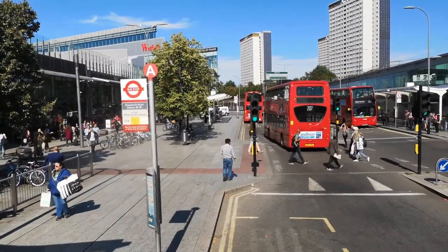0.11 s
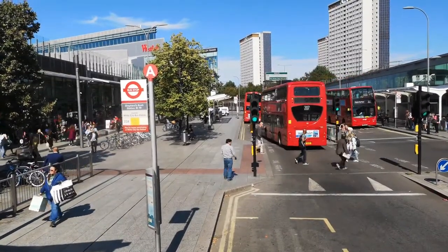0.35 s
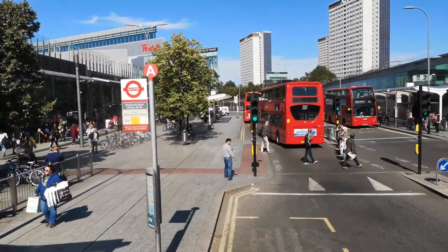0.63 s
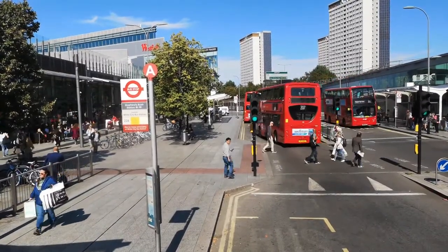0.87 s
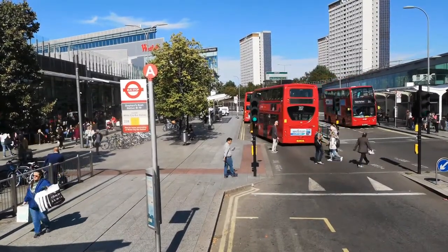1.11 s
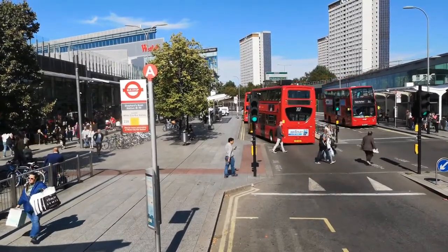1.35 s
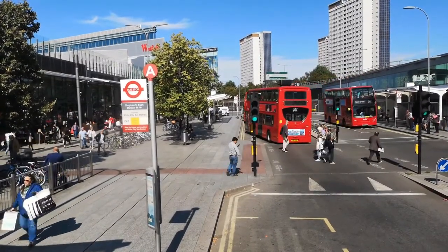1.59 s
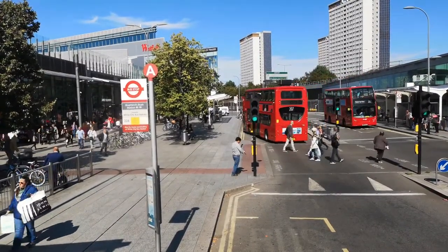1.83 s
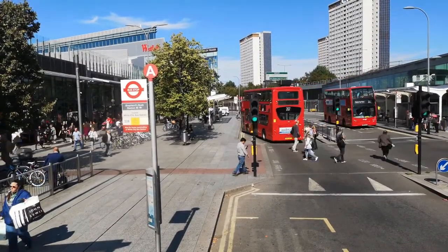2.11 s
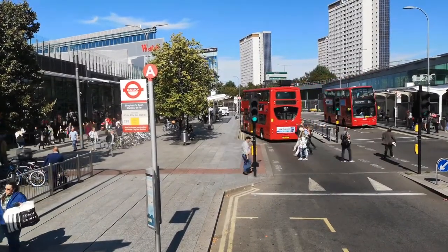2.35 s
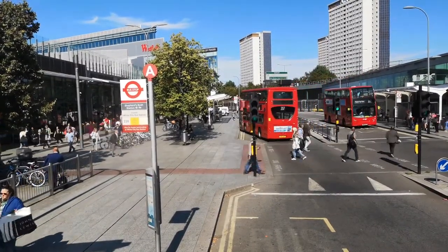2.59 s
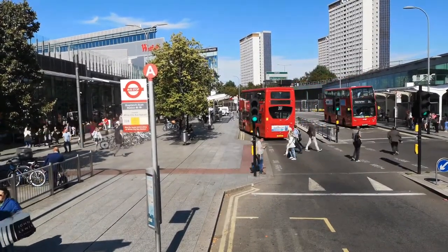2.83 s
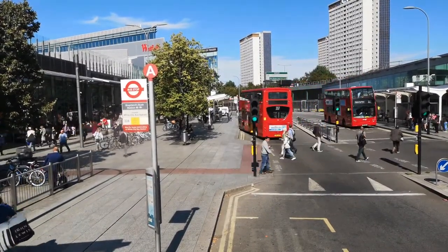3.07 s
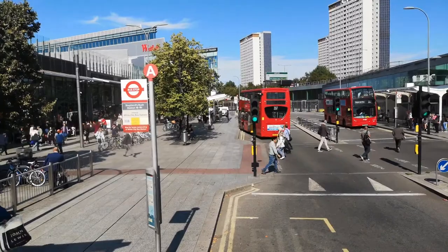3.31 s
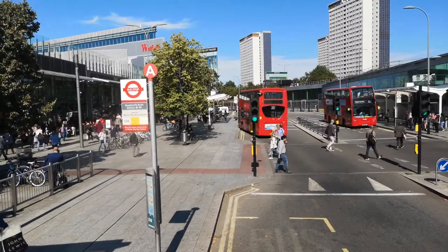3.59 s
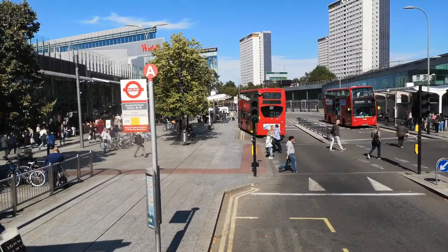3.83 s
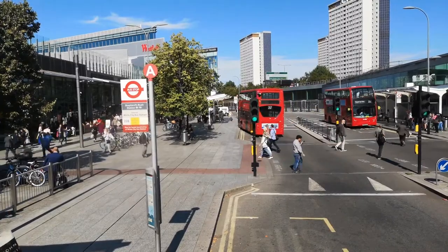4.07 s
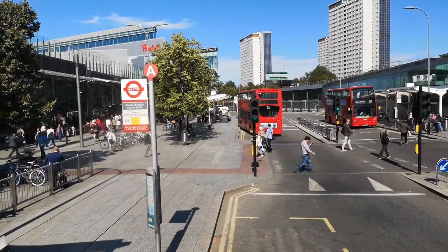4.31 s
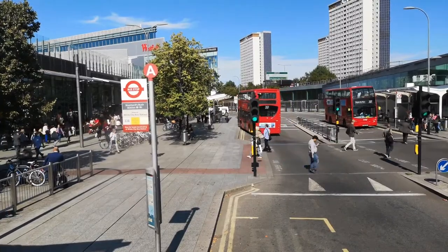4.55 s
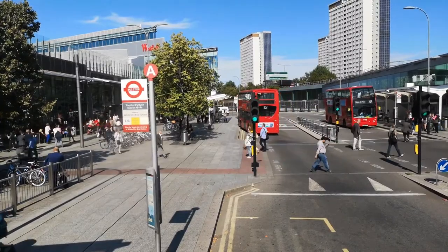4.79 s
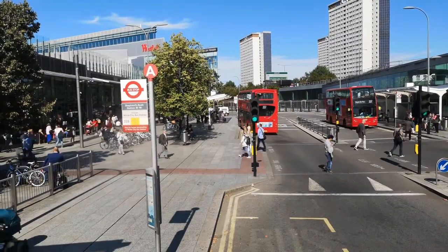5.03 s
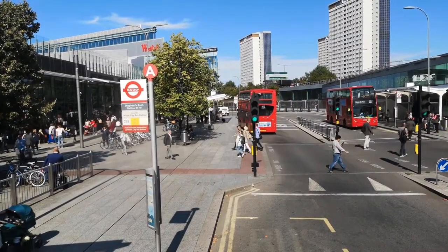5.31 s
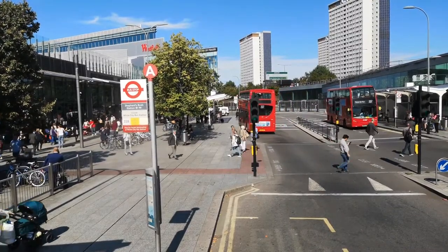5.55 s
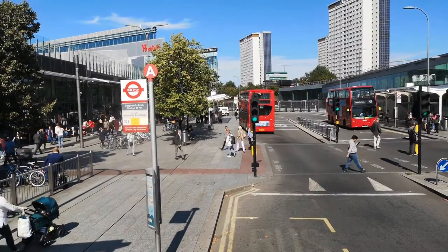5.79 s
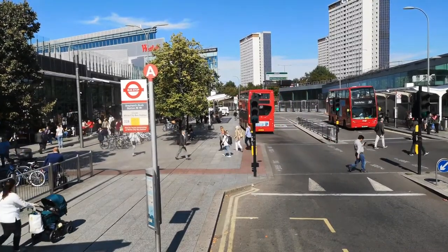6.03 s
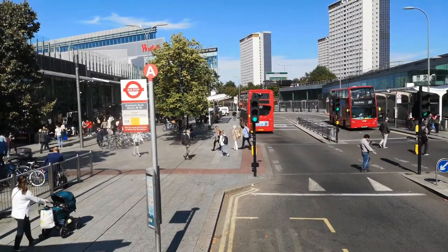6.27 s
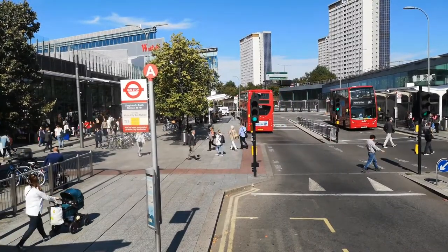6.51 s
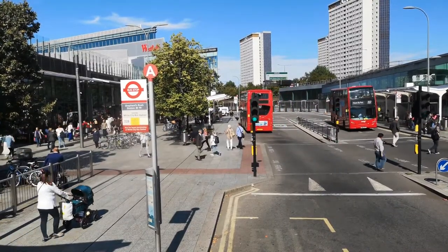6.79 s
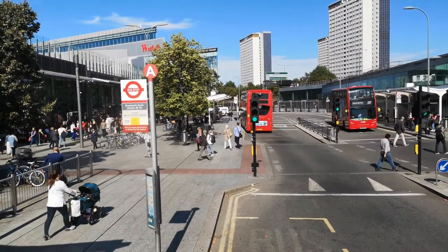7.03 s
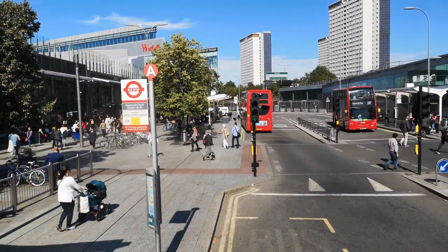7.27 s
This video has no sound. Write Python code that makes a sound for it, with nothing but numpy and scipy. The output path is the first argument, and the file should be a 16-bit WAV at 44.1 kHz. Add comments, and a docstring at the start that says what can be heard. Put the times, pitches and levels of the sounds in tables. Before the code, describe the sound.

A very loud, deep bus idle drone dominates a busy junction, with a vehicle rushing past early, then scattered heel knocks, scuffs and clicks close by.

```python
"""At a street junction a bus idles: its exhaust drones on one deep, nearly pure firing tone with weaker orders.
Traffic roars behind it as shaped noise: a vehicle passes close early on, then the street settles.
Close by, heels ring the paving's modes, hard tips clack and soft blows thump on one low note each.
Soles scuff as gritty noise, small metal parts squeak as resonant noise, and walls answer with a noise tail.
The drone drives the microphone pair into its limiter."""
import sys
import numpy as np
from scipy import signal
from scipy.fft import rfft, irfft, next_fast_len
from scipy.io import wavfile
from scipy.ndimage import uniform_filter1d, minimum_filter1d, map_coordinates

SR = 44100
rng = np.random.default_rng(int(sys.argv[2]) if len(sys.argv) > 2 else 0)


def boost(x):
    """Linear amplitude factor 10**(x/20) for a level x in decibels (scalar or array-like)."""
    u = np.asarray(x, float) / 20
    return 10 ** u


def wav_out(sig):
    """Save sig, one row per channel (or a flat mono array), as 16-bit PCM at SR to the path in sys.argv[1]."""
    wavfile.write(sys.argv[1], SR, np.round(np.clip(np.atleast_2d(sig).T, -1, 1) * 32767).astype(np.int16))


N = 325899

# Grit spectrum of a hard contact with paving. Each row: frequency in Hz, relative level per Hz in dB.
GRIT_SPECTRUM = [(880, -50), (1500, -5), (2100, -6), (2590, -1), (2940, -8), (3250, -8), (4300, -12.5),
                 (6000, -10.5), (7900, -12.5), (9500, -20), (11000, -33), (13000, -37), (15000, -43.5),
                 (16000, -55)]


def unit(x):
    """Scales to rms 1."""
    return x / np.sqrt(np.mean(x ** 2) + 1e-20)


def along(points, hz):
    """Interpolates (Hz, value) points on a log frequency axis."""
    point_hz, value = np.transpose(points)
    return np.interp(np.log(hz + 1), np.log(point_hz + 1), value)


def curves(rows):
    """Gives one value per sample for each column after the time in seconds."""
    s, *columns = np.transpose(rows)
    return [np.interp(np.arange(N) / SR, s, column) for column in columns]


def wobble(knots_per_s):
    """Smooth random curve through normal random knots."""
    return map_coordinates(rng.standard_normal(200), [np.arange(N) * knots_per_s / SR])


def filtered(x, response):
    """Multiplies the spectrum of x by a response of frequency."""
    m = next_fast_len(x.shape[-1] + 8192)
    spectrum = rfft(x, m) * response(np.fft.rfftfreq(m, 1 / SR))
    return irfft(spectrum, m)[..., :x.shape[-1]]


def pair(a, b):
    """Spaced microphones: channels alike in the bass, partly opposed near 900 Hz, unrelated far above."""
    lag_s = 0.00054  # for sound arriving from either side of the street

    def mix_angle(hz):
        correlation = np.cos(2 * np.pi * hz * lag_s) / (1 + (hz / 1000) ** 4)
        return np.arccos(correlation) / 2

    def response(hz):
        return np.array([np.cos(mix_angle(hz)), np.sin(mix_angle(hz))])

    mid, side = filtered(np.array([a, b]), response)
    return np.array([mid + side, mid - side])


def add(track, s, sound):
    """Mixes a short sound into a track at a time in seconds."""
    spot = track[..., round(s * SR):][..., :sound.shape[-1]]
    spot += sound[..., :spot.shape[-1]]


def held(t, length_s, rise_s, t60_s):
    """Envelope that rises exponentially and starts to die after a length."""
    return (1 - np.exp(-t / rise_s)) * boost(-60 * np.maximum(t - length_s, 0) / t60_s)


def rush(spectrum, patchy_db):
    """Stereo noise of rms 1 with time-frequency patches of random gain."""
    z = signal.stft(rng.standard_normal((2, N)), nperseg=1024)[2]
    field = rng.standard_normal(z.shape[1:])
    for axis in (0, 1):
        field = uniform_filter1d(field, size=6, axis=axis)
    noise = signal.istft(z * boost(patchy_db * unit(field)), nperseg=1024)[1][:, :N]
    shaped = filtered(noise, lambda hz: boost(along(spectrum, hz)))
    return unit(pair(*shaped))


def traffic():
    """Distant engines, tyres and air as noise bands under one swell; the air hiss follows it most."""
    # Each row: frequency in Hz, relative level per Hz in dB.
    rumble_spectrum = [(26, -36.5), (45, -12.5), (56, -14), (60, -33.5), (64, -26.5), (76, -17),
                       (92, -22.5), (105, -16.5), (162, -23), (236, -21.5), (269, -29.5), (320, -29.5),
                       (600, -37), (780, -75.5), (1320, -120)]
    tyre_spectrum = [(290, -11.5), (500, -14.5), (581, -9.5), (664, 3.5), (766, -5), (926, -1.5),
                     (1210, -13), (1430, -9), (1780, -11), (2040, -13), (2440, -18), (2690, -18.5),
                     (3300, -36), (4290, -41), (7260, -120)]
    hiss_spectrum = [(1650, -11), (2800, -2.5), (3080, -7.5), (5400, -9), (6250, -12.5), (7550, -12.5),
                     (8730, -14.5), (11300, -30.5), (14700, -38.5), (15500, -60.5), (16000, -72.5)]
    # A close pass early on, then a calmer street. Each row: time in seconds, swell in dB.
    swell = [(0, -8), (0.1, 6), (0.27, 9.5), (0.45, 9.5), (0.72, 15), (1.05, 7.5), (1.3, 4), (1.65, 6.5),
             (2.6, 2), (2.9, 4.5), (3.5, -1), (3.9, 2), (4.5, -3), (4.82, 0), (6.1, -3), (6.9, -2.5),
             (7.15, 1), (7.39, 1.5)]
    swell_db, = curves(swell)
    shared = wobble(16)
    # nominal rms in dB with no swell, plus a share of the swell, plus random flutter
    rumble_db = -21.5 + 0.27 * swell_db + 1.3 * wobble(8.3)
    tyres_db = -32.5 + 0.27 * swell_db + 1.0 * shared
    hiss_db = -47.5 + swell_db + 0.86 * shared
    rumble = boost(rumble_db) * rush(rumble_spectrum, patchy_db=1)
    tyres = boost(tyres_db) * rush(tyre_spectrum, patchy_db=1.0)
    hiss = boost(hiss_db) * rush(hiss_spectrum, patchy_db=2.5)
    return rumble + tyres + hiss


def walls(x):
    """Diffuse echo: a noise tail whose every frequency dies at its own speed."""
    # Each row: frequency in Hz, t60 in seconds.
    wall_decay = [(150, 0.38), (500, 0.21), (2000, 0.38), (10000, 0.055)]
    hz, t, z = signal.stft(rng.standard_normal((2, SR // 2)), SR, nperseg=256)
    decay = boost(-60 * t / along(wall_decay, hz)[:, None])
    tails = signal.istft(z * decay, SR, nperseg=256)[1]
    tails = tails / np.linalg.norm(tails[0])
    return pair(*signal.fftconvolve(x[None], tails, axes=1)[:, :N])


def squeaks():
    """Squeaks, rattles and dull rubs: juddering friction noise through one resonance each."""
    # Each row: start in seconds, level in dB, pitch in Hz, bandwidth in Hz, length in seconds.
    rubs = [(0.118, -38.5, 2630, 251, 0.13), (0.365, -36.5, 2550, 402, 0.18),
            (0.434, -29.5, 1670, 1800, 0.029), (0.463, -29, 2150, 2000, 0.035),
            (0.521, -27, 1960, 1500, 0.034), (0.616, -15, 188, 92.5, 0.078), (0.602, -25, 1720, 198, 0.041),
            (0.61, -28, 2110, 900, 0.061), (0.63, -23.5, 930, 395, 0.055), (0.692, -26, 1680, 403, 0.021),
            (0.713, -31.5, 1500, 1410, 0.045), (0.818, -32, 1100, 890, 0.055),
            (0.813, -37, 2620, 890, 0.055), (0.702, -26.5, 1093, 520, 0.041), (1.369, -36, 3770, 400, 0.03),
            (1.38, -40, 3840, 120, 0.085), (1.455, -37.5, 1650, 400, 0.05),
            (2.022, -42.5, 3320, 149, 0.014), (2.209, -47, 3750, 150, 0.06),
            (2.758, -34.5, 1600, 1500, 0.017), (2.779, -32.5, 2210, 1790, 0.035),
            (2.838, -32.5, 1890, 2200, 0.053), (2.841, -21.5, 193.5, 89, 0.15),
            (2.893, -35, 5050, 200, 0.017), (2.898, -27, 4720, 237, 0.018), (2.947, -39, 4930, 503, 0.035),
            (2.911, -36, 2750, 199, 0.053), (2.916, -39.5, 3140, 1180, 0.064),
            (3.182, -32, 2785, 352, 0.018), (3.829, -30.5, 1990, 1190, 0.023),
            (3.888, -35.5, 3520, 2560, 0.027), (4.25, -39.5, 2770, 496, 0.023),
            (4.256, -32, 1780, 600, 0.018), (4.316, -32.5, 2490, 1190, 0.0082),
            (4.109, -29, 523, 203, 0.0074), (4.626, -49.5, 3470, 594, 0.03),
            (4.692, -35, 1990, 1810, 0.017), (4.758, -42.5, 1500, 1500, 0.011),
            (6.462, -24, 1554, 250, 0.013), (6.569, -37.5, 1960, 1500, 0.004),
            (6.74, -31, 1780, 900, 0.0084), (6.799, -32.5, 1890, 1210, 0.031),
            (6.832, -37, 2520, 250, 0.033), (6.835, -37.5, 7900, 500, 0.008),
            (6.841, -42.5, 7450, 500, 0.0098), (6.887, -52, 7800, 500, 0.043),
            (6.824, -41, 5130, 200, 0.034), (6.887, -49, 4820, 900, 0.045), (7.147, -35, 1605, 204, 0.026),
            (7.315, -31.5, 1920, 1000, 0.0076)]
    rise_share, sag_db, release_t60_s = 0.057, 1.5, 0.17  # rise as a share of the length; sag along it
    track, t = np.zeros((2, N)), np.arange(SR // 5) / SR
    for s, db, centre_hz, width_hz, length_s in rubs:
        noise = rng.standard_normal((2, len(t)))
        band = filtered(noise, lambda hz: 1 / (1 + (2 * (hz - centre_hz) / width_hz) ** 2))
        power = np.abs(uniform_filter1d(np.mean(band ** 2, 0), size=900))
        band = band / np.sqrt(power + 1e-12)  # steady pressure
        judder = boost(1.9 * unit(uniform_filter1d(rng.standard_normal(len(t)), size=300)))
        level = boost(db - sag_db * np.minimum(t / length_s, 1))
        envelope = held(t, length_s, rise_share * length_s, release_t60_s)
        add(track, s, level * envelope * judder * band)
    return pair(*track)


def scuffs():
    """Soles sliding and ticking: gritty noise that swells while the sole slides, then fades."""
    # Each row: start in seconds, level in dB, slide in seconds, tilt in dB an octave.
    slides = [(.108, -14, 0.07, 3.5), (0.358, -35.5, 0.1, -6), (0.52, -26.5, 0.031, 2),
              (0.565, -45, 0.0086, -1), (0.681, -42.5, 0.026, 11.5), (1.699, -31.5, 0.05, 12.5),
              (1.745, -31.5, 0.018, 4), (1.784, -49.5, 0.014, 8), (1.9, -45, 0.0066, 1),
              (2.003, -42, 0.041, 4), (2.149, -43, 0.05, 6.5), (2.211, -39.5, 0.033, 6),
              (2.84, -34.5, 0.048, -3.5), (3.183, -32, 0.015, -4.5), (3.592, -40.5, 0.013, 2),
              (3.833, -37, 0.01, -6), (3.89, -33.5, 0.015, -4.5), (4.038, -42.5, 0.011, 3),
              (4.168, -43.5, 0.017, -2.5), (4.248, -34, 0.018, 2.5), (4.309, -28, 0.0072, -0.5),
              (4.755, -35, 0.012, -2), (5.133, -35.5, 0.0077, -2.5), (5.648, -38.5, 0.012, -5),
              (6.144, -29.5, 0.0063, -11.5), (6.325, -39.5, 0.01, -7), (6.441, -39, 0.0088, -4.5),
              (6.463, -31, 0.039, -8), (6.575, -45, 0.014, -18), (6.743, -46.5, 0.02, 2.5),
              (6.836, -41, 0.036, 6.5), (6.97, -43, 0.027, 0), (7.141, -35.5, .04, -1.5),
              (7.311, -46, 0.01, -20)]
    full_slide_s = 0.09  # rise as long as the slide; shorter slides start more sharply
    track, t = np.zeros((2, N)), np.arange(SR // 4) / SR
    for s, db, slide_s, tilt_db in slides:
        noise = rng.standard_normal((2, len(t)))
        roughness = boost(1.5 * unit(uniform_filter1d(rng.standard_normal(len(t)), size=64)))

        def response(hz):
            return boost(along(GRIT_SPECTRUM, hz) + tilt_db * np.log2(hz / 5000 + 0.0089))

        grit = unit(filtered(noise * roughness, response))
        rise_s = slide_s * (slide_s / full_slide_s) ** 2
        add(track, s, boost(db) * held(t, slide_s, rise_s, 0.15) * grit)
    return pair(*track)


def thumps():
    """Soft low blows that swell and die on one note."""
    # Each row: start in seconds, strength in dB, pitch in Hz.
    blows = [(0.624, -10.5, 112), (0.778, -7, 93.5), (1.618, -18, 78), (2.825, -8, 87.4),
             (3.152, -10, 114.3), (3.454, -10, 85.3), (4.119, -13, 256), (5.381, -2.5, 93.8),
             (5.805, -12.5, 100.3), (6.763, -20, 93)]
    track, t = np.zeros(N), np.arange(SR // 2) / SR
    for s, db, hz in blows:
        envelope = held(t, 0, rise_s=0.01, t60_s=0.31)
        add(track, s, boost(db) * envelope * np.sin(2 * np.pi * hz * t))
    return track


def clacks():
    """Hard heel tips: a noise crack and a few short bright modes, retuned slightly at each strike."""
    # Each row: start in seconds, strength in dB.
    strikes = [(0.525, -39.5), (1.899, -41.5), (2.761, -38), (3.183, -41.5), (3.891, -38), (4.114, -41),
               (4.308, -34), (4.318, -33.5), (4.756, -47), (6.463, -19), (6.475, -28), (6.576, -31)]
    # Each row: nominal frequency in Hz, nominal level in dB, t60 in seconds.
    tip_modes = [(1500, 6, 0.055), (1740, -2.5, 0.14), (2305, -2, 0.098), (2500, -12, 0.12),
                 (2624, -6.5, 0.12), (3265, -10.5, 0.04)]
    crack_db, crack_t60_s = -10, 0.013
    track, t = np.zeros(N), np.arange(SR // 8) / SR
    hz, mode_db, t60_s = np.transpose(tip_modes)[..., None]
    for s, db in strikes:
        levels_db = mode_db + rng.normal(0, 1.6, hz.shape)
        struck_hz = hz * rng.normal(1, 0.017, hz.shape)
        phase = rng.uniform(0, 2 * np.pi, hz.shape)
        modes = boost(levels_db - 60 * t / t60_s) * np.sin(2 * np.pi * struck_hz * t + phase)
        ring = held(t, 0.0075, rise_s=0.0015, t60_s=0.15) * modes.sum(0)
        noise = rng.standard_normal(len(t))
        crack = unit(filtered(noise, lambda f: boost(along(GRIT_SPECTRUM, f)) / (1 + (f / 3000) ** 4)))
        add(track, s, boost(db) * (ring + boost(crack_db - 60 * t / crack_t60_s) * crack))
    return track


def heels():
    """Each strike rings the paving's modes until the sole lands and damps them."""
    # Each row: start in seconds, strength in dB, dull modes in dB, upper modes in dB,
    # ringing before damping in seconds.
    strikes = [(0.521, -16, -11.5, -10, 0.033), (0.615, -34, 11, 4.5, 0.054), (0.982, -9, -28, -32, 0.018),
               (1.491, -18.5, 0.5, -14, 0.02), (1.891, -17.5, -1.5, -9, 0.063),
               (2.332, -22, -9, -24, 0.021), (2.759, -12, -3, -17, 0.014), (2.811, -21.5, -4, -9, 0.024),
               (3.892, -15.5, -6.5, -12.5, 0.021), (4.112, -19.5, 7.5, -21, 0.017),
               (4.307, -6.5, -6, -14, 0.024), (4.753, -23.5, 1.5, -8.5, 0.019),
               (5.728, -23.5, -31, -17.5, 0.018), (5.812, -25, 8, -8, 0.022),
               (6.46, -10.5, 8, -15.5, 0.049), (6.803, -16, -5, -15, 0.018)]
    # Each row: frequency in Hz, nominal level in dB, t60 in seconds.
    slab_modes = [(193.7, 0, 0.29), (237.5, -1, 0.56), (352.2, -0.5, 0.33), (381.7, -0.5, 0.5),
                  (436.6, -2.5, 0.22), (716, 5, 0.092), (912, 3.5, 0.1), (1093, -3, 0.24)]
    track, t = np.zeros(N), np.arange(SR // 4) / SR
    hz, mode_db, t60_s = np.transpose(slab_modes)[..., None]
    group = np.digitize(hz, [300, 600])  # dull, main, upper
    for s, db, dull_db, upper_db, ringing_s in strikes:
        levels_db = mode_db + np.array([dull_db, 0, upper_db])[group] + rng.normal(0, 1.0, hz.shape)
        drift = np.cumsum(rng.normal(0, 0.082, (len(hz), len(t))), 1)
        phase = 2 * np.pi * hz * t + drift * (group > 1)  # loose upper modes lose step
        ring = boost(levels_db - 60 * t / t60_s) * np.sin(phase)
        add(track, s, boost(db) * held(t, ringing_s, rise_s=0.003, t60_s=0.026) * ring.sum(0))
    return track


def bus():
    """Exhaust: an almost pure tone at three firings a turn; the other orders flutter as cylinders differ."""
    # Each row: time in seconds, firing tone rms in dB.
    drone_level = [(0, -3), (0.7, -4), (2.9, -4), (3.9, -3.5), (7.39, -4)]
    # Each row: multiple of the turn rate, nominal rms in dB.
    other_orders = [(2, -16.5), (6, -31.5), (8, -33.5), (12, -40.5), (20, -33)]
    crank_hz = 11.67
    turn = 2 * np.pi * crank_hz * np.arange(N) / SR
    drone = boost(curves(drone_level)[0]) * np.cos(3 * turn + 0.13 * wobble(12.0))
    orders = np.zeros(N)
    for k, db in other_orders:
        orders += boost(db + 3.0 * wobble(8.2)) * np.sin(k * turn + 1.67 * wobble(7))
    return np.sqrt(2) * (drone + orders)


def dips():
    """Gain of traffic and bus: the level dips or lifts briefly, moving fast and returning more slowly."""
    # Each row: start in seconds, nominal depth in dB (negative lifts).
    level_dips = [(0.13, -3), (4.322, 7.5), (6.47, -3.5)]
    fall_s, return_t60_s = 0.025, 0.73
    depth_db = np.zeros(N)
    for s, db in level_dips:
        since_s = np.maximum(np.arange(N) / SR - s, 0)
        depth_db += db * held(since_s, 2 * fall_s, fall_s, return_t60_s)
    return boost(-depth_db)


def scene():
    """Near knocks with their echo, over friction sounds, traffic and the bus."""
    background = dips() * (traffic() + bus())
    friction = scuffs() + squeaks()
    knocks = heels() + clacks()
    echo = boost(-8.5) * walls(knocks + boost(-3) * friction[0])
    placed = knocks * boost([[.4], [-.4]])  # slightly left
    return background + friction + placed + echo + thumps()


def band_limit(x):
    """A steep low-pass at the top of the band."""
    return signal.sosfilt(signal.butter(12, 19310, fs=SR, output="sos"), x)


def record(dry):
    """The pair leans with frequency; a limiter ducks around peaks and what still exceeds full scale clips."""
    # Each row: frequency in Hz, left over right in dB.
    channel_lean = [(60, 0.0), (180, -0.5), (550, 0), (1650, -1.0), (4970, -1.5), (15000, 1)]
    ceiling = 1.01
    x = filtered(dry, lambda hz: boost(np.outer([.5, -.5], along(channel_lean, hz))))
    need = np.minimum(1, ceiling / (np.abs(x).max(0) + 1e-9))
    lowest = minimum_filter1d(need, size=1400, origin=500)  # holds mostly after the peak
    gain = uniform_filter1d(lowest, size=400)
    return band_limit(np.clip(x * gain, -1, 1))


dry = scene()
out = record(dry)
wav_out(out)
```